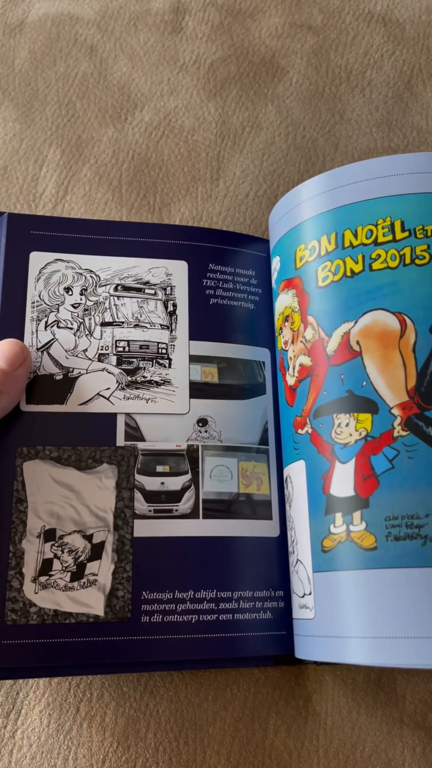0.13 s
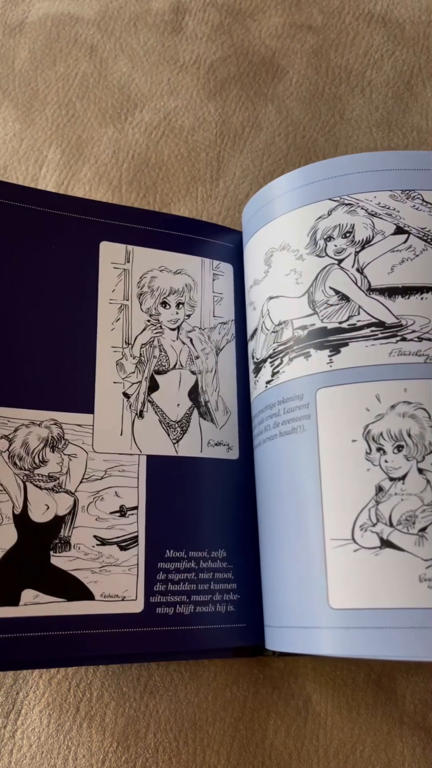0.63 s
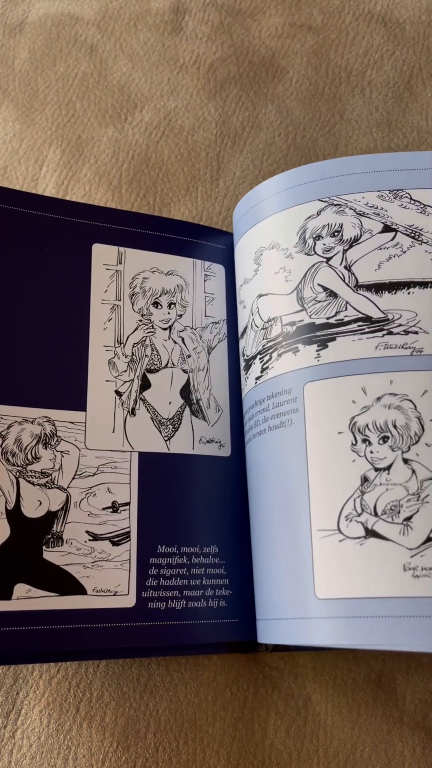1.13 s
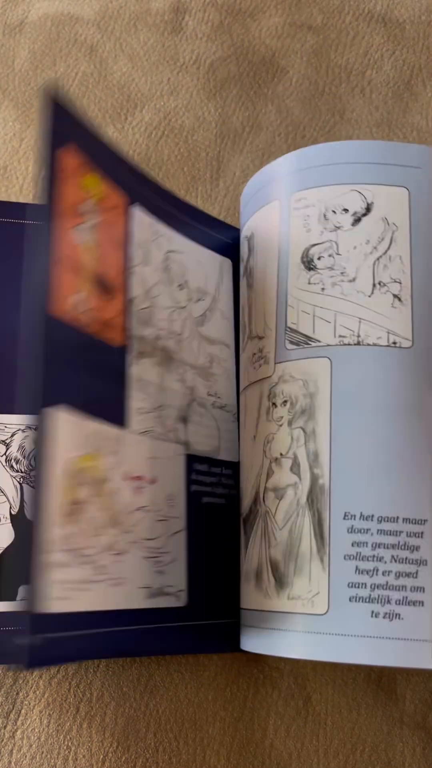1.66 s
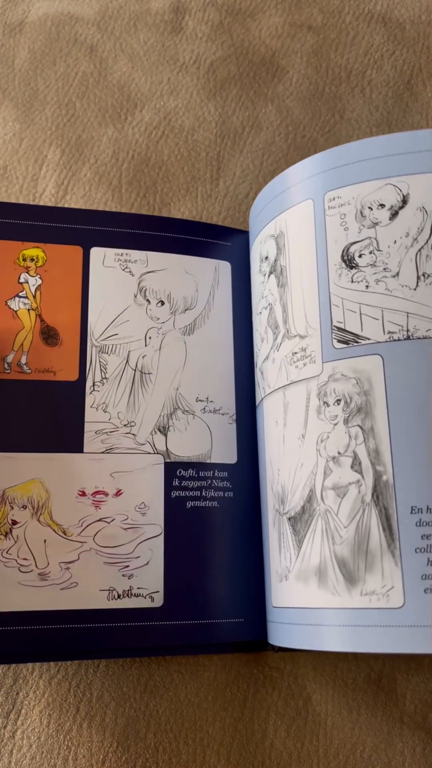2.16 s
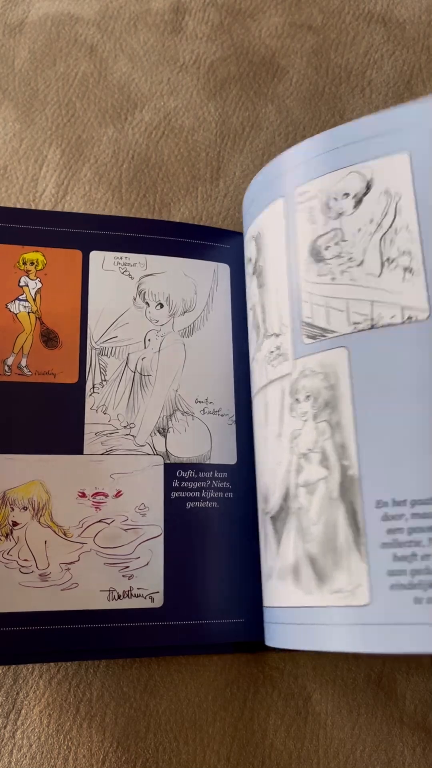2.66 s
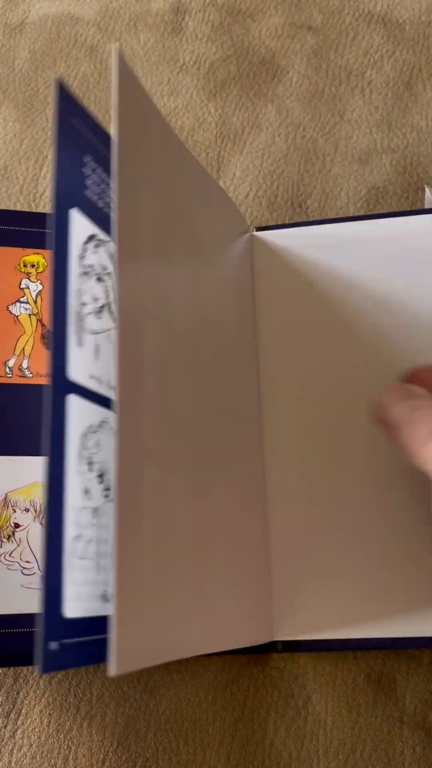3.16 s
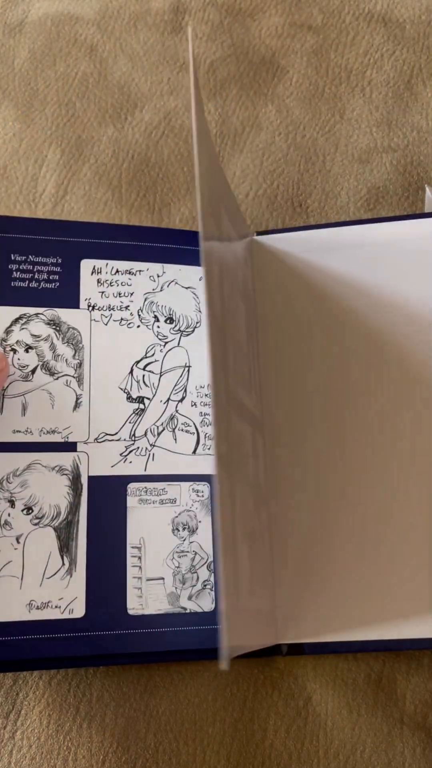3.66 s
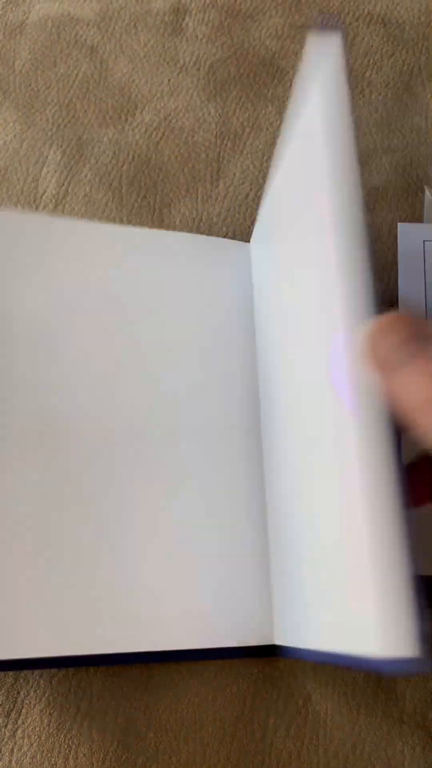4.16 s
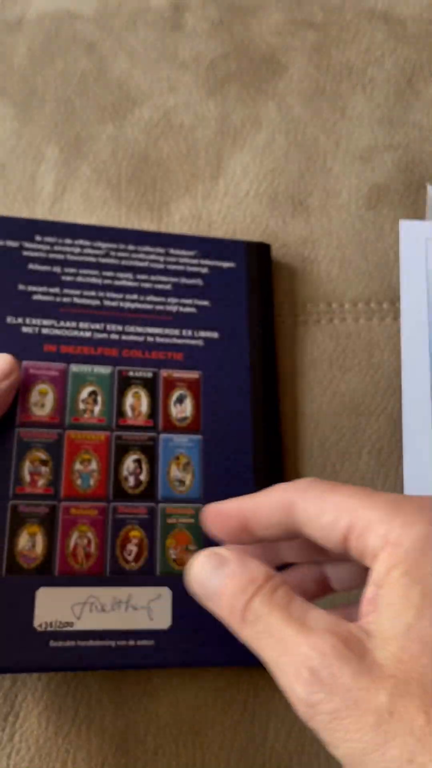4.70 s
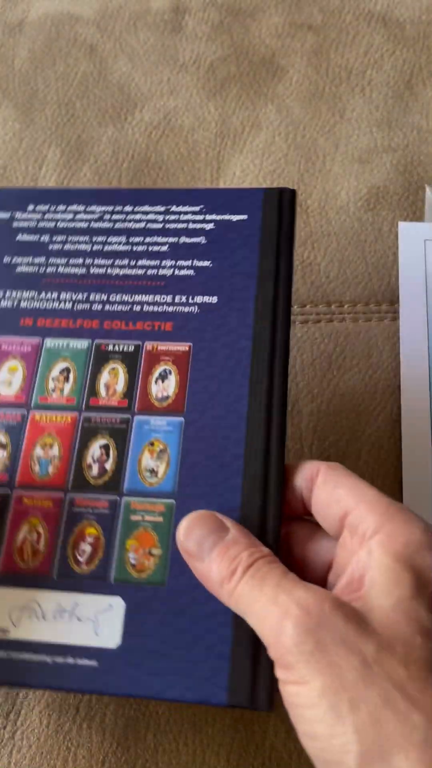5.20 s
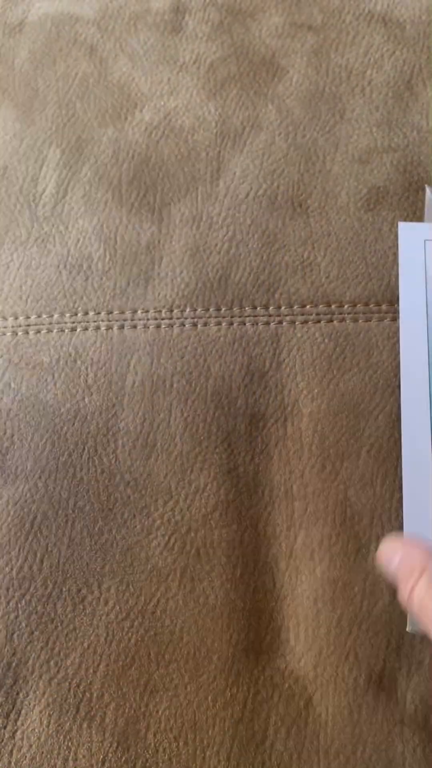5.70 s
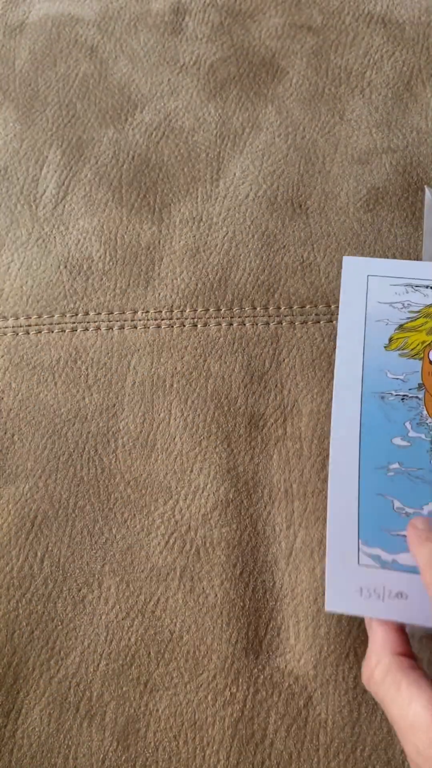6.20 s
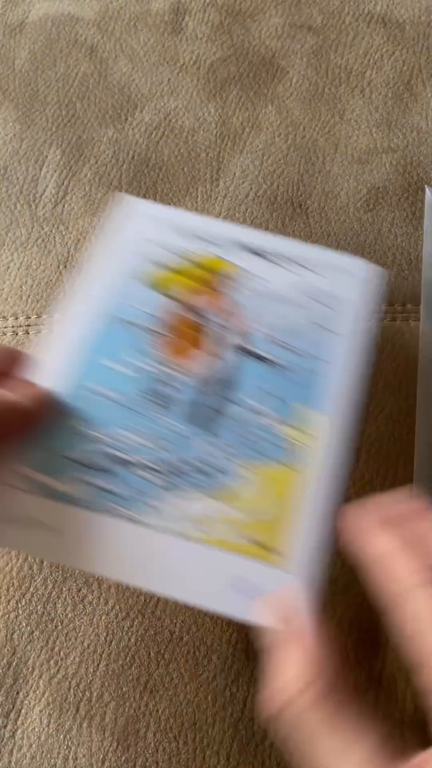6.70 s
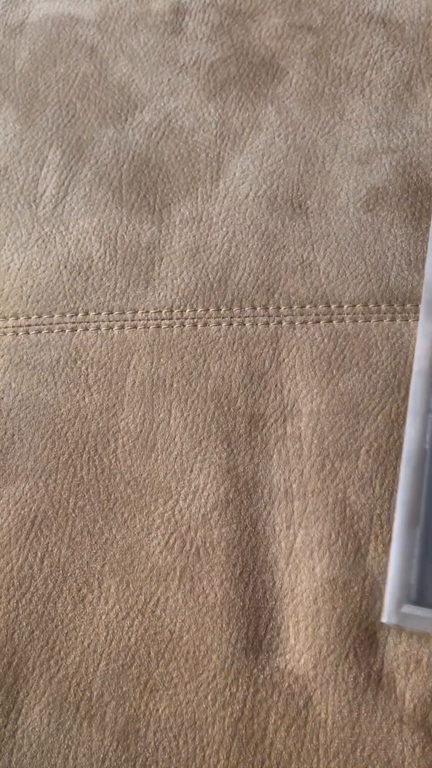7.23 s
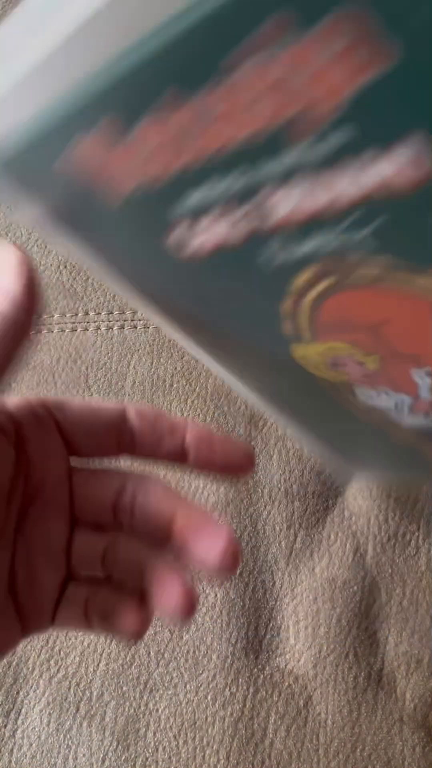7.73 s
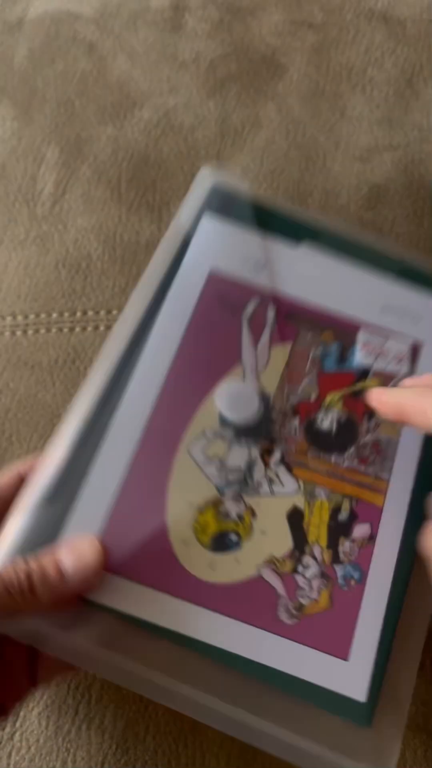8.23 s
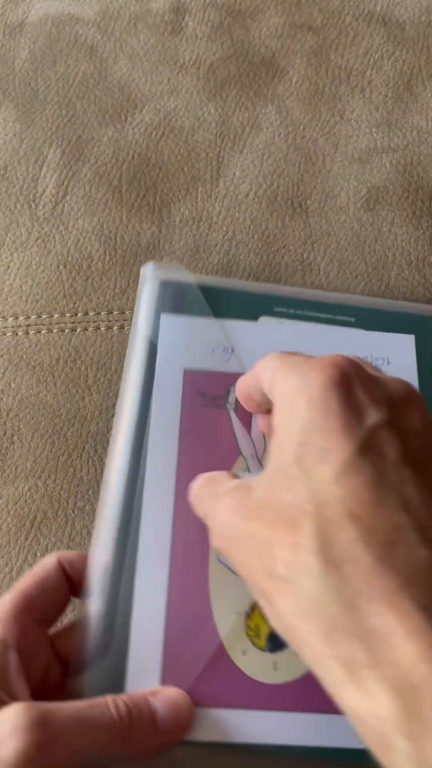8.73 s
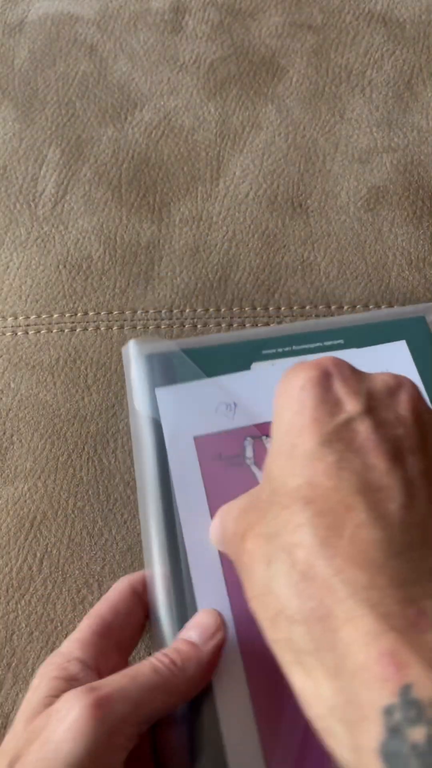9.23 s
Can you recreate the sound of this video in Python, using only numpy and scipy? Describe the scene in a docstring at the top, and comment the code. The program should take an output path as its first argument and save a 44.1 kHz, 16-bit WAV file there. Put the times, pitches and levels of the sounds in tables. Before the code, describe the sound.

Close handling sounds in a quiet, soft-furnished room, over faint rumble and hiss. At 0.2 and 0.4 s glossy pages flick with small snaps; soft sliding follows, with another turn at 1.35 to 1.9 s. A brighter flick snaps at 2.75 s, then a dull cover bump and light ticks at 3.3 s. Sparse, faint paper clicks run through 4.0 to 4.6 s as the book shuts; fingers tap and rub the cover around 5 s. At 6.0 s comes a knock, then at 6.2 s a deep, heavy cushioned thud, the strongest low hit. Card rustles and ticks until 6.6 s; a cluster of sharp snaps comes at 7.0 s. At 7.7 s the plastic sleeve is grabbed: loud crumple, knock and a brief falling squeak. Crisp clacks follow at 7.9, 8.1 and 8.3 s, then rubbing and crackles, with hard snaps at 9.1 and 9.3 s.

```python
"""Book pages and a plastic sleeve

Pages of a hardcover book are turned on a leather couch, then a print and a plastic sleeve are picked up.
Fingers and sheets rub as filtered grains, paper and plastic snap as bursts that ring resonators, covers thud
on the cushion as sagging sines and the sleeve squeaks once as a gliding harmonic tone.
A low rumble of filtered noise and a faint hiss lie under it; the mono mix is widened to stereo by frequency.
"""
import sys
import numpy as np
from scipy import signal
from scipy.fft import rfft, irfft, next_fast_len
from scipy.io import wavfile

SR = 44100
rng = np.random.default_rng(int(sys.argv[2]) if len(sys.argv) > 2 else 0)


def materialize(psi):
    """Save the field psi as 16-bit PCM at rate SR to the path in sys.argv[1].

    A 1-D psi becomes a single channel; in a 2-D psi each row is a channel.
    """
    bounded = np.clip(np.atleast_2d(psi).T, -1, 1)
    quanta = np.round(bounded * 32767).astype(np.int16)
    wavfile.write(sys.argv[1], SR, quanta)


def volts_from_decibels(level):
    """Turn decibel levels (scalar or array-like) into linear amplitude factors."""
    exponent = np.asarray(level, float) / 20
    return 10 ** exponent


N = 413216
TIME = np.arange(N) / SR
SIZE = next_fast_len(N + SR // 2)
HZ = np.maximum(np.arange(SIZE // 2 + 1) * SR / SIZE, 1)


def rms_one(x):
    """Normalisation: scale to unit rms."""
    return x / np.sqrt(np.mean(x ** 2) + 1e-20)


def peak_one(x):
    """Normalisation: scale to unit peak."""
    return x / np.max(np.abs(x))


def in_time(rows):
    """Linear interpolation: the columns of a curve at every sample."""
    s, *columns = np.transpose(rows)
    return [np.interp(TIME, s, c) for c in columns]


def at_hz(points):
    """Interpolation on a log frequency axis: a spectrum at every frequency."""
    hz, values = np.array(points).T
    return np.interp(np.log(HZ), np.log(hz), values)


def colour(x, gain):
    """Linear filtering: weight the spectrum by a gain."""
    return irfft(rfft(x, SIZE) * gain, SIZE)[..., :N]


def drift(rate_hz):
    """Low-passed noise: a slow random fluctuation of unit rms."""
    return rms_one(colour(rng.standard_normal(N), 1 / (1 + (HZ / rate_hz) ** 2)))


def ring(x, hz, t60):
    """Damped resonator: a unit click sets a decaying sine of height 1 ringing."""
    radius = volts_from_decibels(-60 / (t60 * SR))
    angle = 2 * np.pi * min(hz, .4 * SR) / SR
    return signal.lfilter([0, np.sin(angle)], [1, -2 * radius * np.cos(angle), radius * radius], x)


def follow(x, hz, width_hz):
    """Heterodyne filter: a moving resonance is shifted to zero, smoothed and shifted back."""
    turn = np.exp(2j * np.pi * np.cumsum(hz) / SR)
    radius = np.exp(-np.pi * width_hz / SR)
    return np.real(turn * signal.lfilter([1], [1, -2 * radius, radius * radius], x / turn))


def add(out, s, sound):
    """Superposition: mix a sound in from time s."""
    i = round(s * SR)
    out[i:i + len(sound)] += sound[:N - i]


def rub():
    """Friction noise: grains catch in clumps over a smooth hiss; the bent sheet rings as it is gripped."""
    # tone of the handled material, stage by stage: book first, then print, then plastic sleeve
    # (from [s], hollow part [dB], ring of the bent sheet at gloss 0 [Hz], share of that ring [0-1])
    held = [(0.0, 4, 2180, 0.56), (1.25, -3, 2630, 0.06), (2.9, -0.5, 2900, 0.1), (4.3, -5, 2150, .15),
            (5.5, -10.5, 3000, 0), (6.501, -0.5, 2200, 0.18), (7.55, -4, 3920, 0.26),
            (8.55, -12, 2510, 0.16)]
    # colour of the rub, shaping each band before it is levelled: (frequency [Hz], density [dB per Hz])
    rub_colour = [(250, 5.5), (500, -8), (760, -5), (900, -2), (1080, -7.5), (1500, -4.5), (2400, 0),
                  (3600, -6.5), (5000, -14.5), (7000, -13.5), (10500, 4), (12200, 8), (14000, -30)]
    grains_per_s, crackles_per_s, crackle = 2500, 120, 0.43
    spread_db, clump_db, smooth = 3.0, -0.5, 1.0
    low_hz, high_hz, top_hz = 1350, 4800, 8800   # band edges
    bend_octaves_per_db, bend_width_hz = 0.015, 750   # glossier contact rings higher
    top_slope = 0.24   # a glossier slide is brighter still at the very top

    level, gloss_db = strokes()
    holding = np.searchsorted([row[0] for row in held[1:]], TIME)
    _, hollow_db, bend_hz, bend_share = np.array(held)[holding].T
    bend_hz = bend_hz * 2 ** (bend_octaves_per_db * gloss_db)

    sizes = volts_from_decibels(spread_db * np.minimum(rng.exponential(1, N), 5)) * rng.choice([-1, 1], N)
    grains = rms_one(sizes * (rng.random(N) < grains_per_s / SR))
    crackles = rms_one(sizes * (rng.random(N) < crackles_per_s / SR))   # sparse small creases
    source = grains + crackle * crackles + smooth * rng.standard_normal(N)
    source = source * volts_from_decibels(clump_db * drift(21.0))

    low = 1 / (1 + (HZ / low_hz) ** 6)
    high = 1 / (1 + (high_hz / HZ) ** 8)
    top = 1 / (1 + (top_hz / HZ) ** 12)
    bands = np.array([low, 1 - low - high, high - top, top])
    hollow, middle, sheen, air = map(rms_one, colour(source, volts_from_decibels(at_hz(rub_colour)) * bands))
    bend = rms_one(follow(source, bend_hz, bend_width_hz))
    middle = bend_share * bend + (1 - bend_share) * middle

    gains_db = [hollow_db, -1.5, gloss_db + 7, (1 + top_slope) * gloss_db + 0.1]
    flicker_db = [1.1 * drift(31.0) for _ in gains_db]
    parts = [hollow, middle, sheen, air]
    return level * sum(volts_from_decibels(g + f) * p for g, f, p in zip(gains_db, flicker_db, parts))


def strokes():
    """Incoherent addition: slides and flicks sum by power into a contact strength and a mean gloss."""
    # sheets and fingers sliding under steady contact:
    # (start [s], end [s], start level [dB], end level [dB], gloss [dB])
    slides = [(0.44, 0.637, -63, -77, -14), (0.871, 1.015, -75, -81.5, -32), (1.03, 1.123, -80, -84.5, -1),
              (1.296, 1.447, -69, -64.5, -7), (1.47, 1.623, -84, -71.5, -19.5),
              (1.62, 1.84, -68.5, -65, -1), (1.89, 1.954, -64.5, -62.5, -11),
              (1.99, 2.221, -71.5, -76, -14), (2.449, 2.591, -76.5, -69, -10.5),
              (3.313, 3.526, -67.5, -82, -12.5), (3.46, 3.513, -86, -80.5, 26),
              (3.93, 4.056, -87, -89, 4.5), (4.14, 4.184, -92, -92, 18), (4.72, 4.835, -83, -76, -12),
              (4.952, 5.058, -68, -71.5, 5), (5.05, 5.154, -83, -88, 12), (5.272, 5.31, -68.5, -61, 1),
              (5.345, 5.411, -68.5, -68, 8), (5.861, 5.91, -63.5, -74, -11), (5.898, 6.21, -64, -60, 1),
              (6.228, 6.398, -67.5, -54, -3), (6.413, 6.596, -51.5, -61, -5),
              (6.771, 6.87, -74.5, -80.5, 9.5), (7, 7.084, -44.5, -48.5, -10),
              (7.092, 7.139, -56.5, -55.5, -2.1), (7.15, 7.301, -65.5, -62, 3),
              (7.32, 7.502, -67.5, -66.5, -3), (7.563, 7.722, -74, -64, -1.5), (7.79, 8.05, -53, -72, 20),
              (8.16, 8.297, -67.5, -49.5, -8), (8.317, 8.603, -60, -75.5, -3.5),
              (8.609, 8.725, -55.5, -51, -13.5), (8.738, 8.825, -48.5, -43, -14),
              (8.932, 9.069, -60, -49.5, -9), (9.116, 9.256, -72.5, -56.5, -0.5)]
    # sheets flicked or crumpled, swelling to a peak; rise and fall are the times to change by span_db:
    # (peak time [s], level [dB], rise [s], fall [s], gloss [dB])
    flicks = [(0.167, -62.5, 0.094, 0.054, 0), (0.43, -64.5, 0.13, .1, -14.5), (1.83, -55, 0.052, 0.12, -3),
              (2.348, -60.5, 0.091, 0.042, -24), (2.66, -55, 0.03, 0.029, 6),
              (2.757, -47.5, 0.056, 0.04, -7), (2.8, -64.5, 0.022, 0.16, -9.5),
              (3.004, -69.5, 0.044, 0.032, -9), (3.582, -73.5, 0.0082, 0.2, -12),
              (4.072, -73, .005, 0.14, -3), (4.44, -64.5, 0.013, .06, 0.5), (5.052, -56, 0.0056, .12, -1),
              (6.211, -45, 0.12, 0.04, -10), (5.6, -73.5, 0.24, 0.14, -14), (6.888, -54, 0.018, 0.13, 1),
              (7.735, -26.5, 0.039, .12, -12.5), (7.923, -42.5, 0.13, 0.14, -7),
              (8.116, -36, 0.094, 0.043, -8), (8.304, -27, 0.0066, 0.0047, -33),
              (8.906, -38.5, 0.079, 0.052, -10), (9.081, -49, 0.025, 0.078, -5.5),
              (9.277, -41, 0.017, 0.1, -6)]
    span_db = 30
    touch_db_per_s, let_go_db_per_s = 1701.5, 893   # a slide sets in and dies away
    levels_db, gloss_db = [], []
    for start, end, start_db, end_db, gloss in slides:
        outside = np.maximum(touch_db_per_s * (start - TIME), let_go_db_per_s * (TIME - end))
        levels_db.append(np.interp(TIME, [start, end], [start_db, end_db]) - np.maximum(0, outside))
        gloss_db.append(gloss)
    for s, db, rise, fall, gloss in flicks:
        away = np.maximum((s - TIME) / max(rise, .001), (TIME - s) / max(fall, .001))
        levels_db.append(db - span_db * away)
        gloss_db.append(gloss)
    power = np.array([volts_from_decibels(2 * np.maximum(db, -150)) for db in levels_db])
    total = power.sum(axis=0)
    return np.sqrt(total), np.array(gloss_db) @ power / total


def page_gaps(x):
    """Sympathetic resonance: while the book lies open, the slits between its pages ring along."""
    # air between the pages: (resonance [Hz], width [Hz], level [dB])
    gaps = [(893, 350, 2), (1727, 96, -8), (2240, 31, -6), (3860, 1100, -5), (5550, 460, 4.5)]
    book_shut_s = 4.2
    response = sum(volts_from_decibels(db) / (1 + 2j * (HZ - hz) / width_hz) for hz, width_hz, db in gaps)
    return x + colour(x * (TIME < book_shut_s), response)


def patches(x, patchy_db=2.5, rate_hz=6.2, count=14):
    """Uneven radiation: as the sheet flexes, each slice of the spectrum swells and sinks on its own."""
    place = np.interp(np.log(HZ), np.log([500, 12000]), [0, count - 1])
    # overlapping triangles that sum to one
    slices = colour(x, np.clip(1 - np.abs(place - np.arange(count)[:, None]), 0, 1))
    return sum(volts_from_decibels(patchy_db * drift(rate_hz)) * part for part in slices)


def snaps():
    """Buckling instability: a sheet lets go in a brief burst after a faint lead-in, rings and rustles."""
    # paper and plastic buckling: (release [s], level [dB], ring [Hz], crispness [dB])
    buckles = [(0.17, -32, 1110, -0.5), (0.424, -37.5, 2190, -22), (0.436, -35.5, 1440, -8),
               (1.352, -38.5, 4500, -2.5), (1.555, -47.5, 860, -58), (1.82, -42, 2750, -5),
               (1.928, -44.5, 2080, -30), (2.24, -51, 880, -37), (2.512, -51, 860, -18),
               (2.75, -39.5, 2560, 7), (2.794, -31, 2750, -3.5), (2.835, -45, 780, -7),
               (2.945, -48.5, 920, -69), (3.311, -36, 1760, -10.5), (3.328, -38, 1410, -15),
               (3.348, -40, 890, -17.5), (3.462, -42, 885, -54), (3.482, -46.5, 876, -8),
               (3.58, -57, 3020, -28), (3.61, -54, 760, -38), (3.687, -56.5, 1420, -11),
               (3.778, -48, 960, -48), (4.072, -39.5, 1820, 12), (4.439, -45.5, 1680, -18),
               (4.575, -48, 1910, -18), (4.903, -56, 820, -1), (4.948, -44.5, 990, 8),
               (5.054, -32, 1070, -21.5), (5.078, -54, 2790, -11), (5.093, -50, 1060, 7),
               (5.104, -43, 1180, -8), (5.307, -43, 1140, -22), (5.355, -43, 1280, -9),
               (5.851, -47, 2980, -23), (6.006, -25.5, 756, -20), (6.096, -37.5, 895, -29),
               (6.201, -23.5, 970, -18), (6.221, -32, 850, -18), (6.269, -35, 1950, -19),
               (6.536, -37.5, 1250, -24), (6.557, -37.5, 1110, -4.5), (6.586, -34.5, 1300, -7.5),
               (6.626, -41.5, 1290, -32), (6.883, -26, 2380, -10.5), (6.921, -41, 3190, 0),
               (6.993, -33, 1200, -2), (7.009, -24.5, 1370, -7), (7.03, -19, 1630, -12),
               (7.044, -18.5, 2700, -15), (7.125, -38, 1840, 0), (7.203, -33, 2090, -51),
               (7.232, -34.5, 1860, -6), (7.322, -34.5, 2040, -13), (7.348, -37, 1740, -7),
               (7.683, -30.5, 2580, -15.5), (7.768, -17, 1380, -16), (7.862, -28.5, 1900, -15.5),
               (7.926, -17, 3860, -26), (7.933, -18.5, 3170, -38), (7.97, -33, 2760, -57.5),
               (8.015, -33.5, 1740, -10), (8.124, -21.5, 890, -15), (8.267, -15, 2570, -15),
               (8.3, -15, 1880, -10), (8.369, -43, 1840, 2.5), (8.625, -37, 2490, -17),
               (8.738, -26.5, 2510, -46), (8.763, -22, 2860, -29), (8.919, -26.5, 2480, -16),
               (9.082, -18.5, 2780, -14.5), (9.088, -28.5, 950, -32), (9.211, -40.5, 2480, 1),
               (9.239, -37.5, 3000, -14), (9.278, -15.5, 3350, -1.5), (9.282, -12, 1170, -18),
               (9.34, -28.5, 2440, -16)]
    lead_s, lead_in_db, lead_in_s = 0.02, -24.5, 0.0056   # faint noise rises before each snap
    burst_s, slack_db = 0.00054, 9.0   # shortest time constant, and its growth with the moving sheet
    rustle_db, rustle_s = -8.5, 0.0043
    cycles, ring_share = 8.0, 0.59   # ring periods per 60 dB of decay
    # crisp buckles are broader and crack higher
    wide_db, wide_per_crisp = 3.5, 0.46
    treble_db, crack_hz, crack_octaves_per_db = 10.0, 6800, 0.08
    # dull, low buckles move more of the sheet
    body_db, body_hz, body_per_crisp, body_db_per_octave = -24.5, 480, -0.3, -5.5

    out, t = np.zeros(N), TIME[:4096]
    noise = rng.standard_normal((len(buckles), 2, len(t)))
    wide_band = signal.butter(2, [900, 4600], "band", fs=SR, output="sos")
    after = np.maximum(t - lead_s, 0)
    lead_in = volts_from_decibels(lead_in_db) * np.exp(np.minimum(t - lead_s, 0) / lead_in_s)
    rustle = volts_from_decibels(rustle_db) * np.exp(-after / rustle_s)
    for (s, db, hz, crisp_db), (first, second) in zip(buckles, noise):
        low_db = body_db + body_per_crisp * crisp_db + body_db_per_octave * np.log2(hz / 1500)
        lasts = burst_s * (1 + volts_from_decibels(low_db + slack_db))   # the more sheet moves, the slower it lets go
        release = after / lasts * np.exp(-after / lasts)
        shape = np.where(t < lead_s, lead_in, release + rustle)
        burst = first * shape

        corner_hz = min(crack_hz * 2 ** (crack_octaves_per_db * crisp_db), .4 * SR)
        crack_band = signal.butter(2, corner_hz, "high", fs=SR, output="sos")
        ringing = peak_one(ring(burst, hz, cycles / hz))
        wide = volts_from_decibels(wide_db + wide_per_crisp * crisp_db) * peak_one(signal.sosfilt(wide_band, burst))
        crack = volts_from_decibels(crisp_db + treble_db) * peak_one(signal.sosfilt(crack_band, second * shape))
        body = volts_from_decibels(low_db) * peak_one(ring(burst, body_hz, 1.0 / body_hz))
        sound = ring_share * ringing + (1 - ring_share) * wide + crack + body
        add(out, s - lead_s, volts_from_decibels(db) * sound)
    return out


def thuds():
    """Damped impact: an uneven push sags in pitch as squeezed air escapes; a deep cushion note swells."""
    # covers and sheets landing on the cushion:
    # (time [s], level [dB], end pitch [Hz], weight on the cushion [dB re the deep note's own gain])
    landings = [(0.424, -39.5, 199, -20), (0.559, -51.5, 259, -25), (2.792, -47.5, 167, -14),
                (2.941, -41, 78, -19), (3.327, -34, 71, -23), (3.456, -41.5, 214.3, -23),
                (5.057, -39, 175.4, -18), (6.006, -29.5, 227, -5.5), (6.204, -0.5, 91.8, -20),
                (7, -44, 232, -22), (7.03, -37, 225, -24), (7.045, -39, 190, -16), (7.331, -38, 158.3, -1),
                (7.353, -31.5, 161.6, -33), (7.738, -16.5, 289, -33.5), (7.772, -18, 137.7, -18),
                (8.013, -32.5, 83, -1), (8.053, -43, 89, 14), (8.109, -35, 88, -16), (8.267, -29, 310, -17),
                (8.302, -26.5, 94.3, -8), (8.727, -46, 61, 2.5), (9.086, -36.5, 248, -24),
                (9.282, -36, 109, -21), (9.337, -36.5, 200, -29)]
    pitch_excess, fall_s, rise_s = 2.51, 0.00437, 0.0078   # start pitch is 1 + excess times the end pitch
    deep_gain_db, deep_hz, deep_t60, deep_rise_s = 11.0, 64, 0.11, 0.022
    soft_db, soft_t60_s, t60_halves_db = -50, .21, 16.5   # harder landings are squeezed dead sooner
    uneven_db, cut_hz = 4.0, 35

    out, t = np.zeros(N), TIME[:SR // 3]
    deep = (1 - np.exp(-t / deep_rise_s)) * volts_from_decibels(-60 * t / deep_t60) * np.sin(2 * np.pi * deep_hz * t)
    for s, db, hz, deep_db in landings:
        t60 = soft_t60_s * .5 ** ((db - soft_db) / t60_halves_db)
        cycles = hz * (t + pitch_excess * fall_s * (1 - np.exp(-t / fall_s)))
        push = volts_from_decibels(-60 * t / t60) * (1 - np.exp(-t / rise_s)) * np.sin(2 * np.pi * cycles)
        add(out, s, volts_from_decibels(db) * (push + volts_from_decibels(deep_db + deep_gain_db) * deep))
    # the very lowest frequencies are cut away
    high_pass = signal.butter(2, cut_hz, "high", fs=SR, output="sos")
    return signal.sosfilt(high_pass, out * volts_from_decibels(uneven_db * drift(98.0)))


def squeak(jitter=0.033, waver_db=-4.0, fade_s=0.016):
    """Stick-slip: plastic slips over plastic at a gliding rate, uneven in pitch and strength."""
    # (time [s], slip rate [Hz], level [dB])
    slips = [(7.712, 1707, -38), (7.742, 1482, -24.5), (7.761, 1306, -27), (7.796, 1410, -53)]
    # (multiple of the slip rate [1], level [dB re fundamental])
    overtones = [(2, -12), (3, -12)]
    hz, db = in_time(slips)
    phase = 2 * np.pi * np.cumsum(hz * (1 + jitter * drift(150.))) / SR
    tone = np.sin(phase)
    for multiple, overtone_db in overtones:
        tone = tone + volts_from_decibels(overtone_db + waver_db * drift(200.)) * np.sin(multiple * phase)
    gate = np.clip(np.minimum(TIME - slips[0][0], slips[-1][0] - TIME) / fade_s, 0, 1)
    return np.sqrt(2) * volts_from_decibels(db + waver_db * drift(200.)) * gate * tone


def room(x):
    """Reverberation: six feedback delays a side, duller on every round."""
    t60_s, level_db, wall_cut_hz = 0.18, -17, 2500   # decay before the wall loss
    wet = np.zeros((2, len(HZ)), complex)
    for k, lag in enumerate(rng.uniform(0.01, 0.027, 12)):
        delay = np.exp(-2j * np.pi * HZ * lag)
        loop = volts_from_decibels(-60 * lag / t60_s) / (1 + 1j * HZ / wall_cut_hz) * delay
        wet[k % 2] += loop / (1 - loop) * (-1) ** (k // 2)
    return volts_from_decibels(level_db) * colour(x, wet / (1 + (250 / HZ) ** 4))   # soft furniture, little low echo


def widen(x):
    """Stereo decorrelation: phase and balance of a mono mix turn by frequency; random flutter loosens it."""
    # (frequency [Hz], phase by which left leads [rad])
    side_phase = [(0, 0), (1890, 0.0), (2580, 0.5), (3960, 0.8), (4500, 1.3), (4720, 1.9), (4980, 4.4),
                  (5250, 5.2), (5680, 6.2), (6200, 6.4), (8350, 9.1), (9560, 9.5), (11800, 12.4),
                  (13800, 12.7), (14500, 15.3), (15200, 15.1)]
    # (frequency [Hz], left minus right [dB])
    side_balance = [(60, 0.0), (120, -0.5), (240, -1.5), (480, -2.0), (950, -1.0), (1890, -0.5),
                    (3770, -1.0), (7520, 0.0), (15000, 0.0)]
    # strength of the flutter: (frequency [Hz], level [dB])
    flutter_colour = [(150, -34), (300, -18), (550, -11), (1000, -16), (1700, -24), (2700, -9), (3800, -10),
                      (4850, -7), (5400, -10), (5900, -14), (7200, -9), (8300, -16), (9300, -30),
                      (11000, -15), (15000, -20)]
    # half of each difference goes to either side, as a complex log gain
    half = .5j * np.interp(HZ, *np.transpose(side_phase)) + np.log(10) / 40 * at_hz(side_balance)
    flutter = np.array([drift(25.), drift(25.)])   # independent on each side
    return colour(x, np.exp([half, -half])) + flutter * colour(x, volts_from_decibels(at_hz(flutter_colour)))


def rumble():
    """Band-limited noise: a low rumble whose level rises and dips, with thud tails and page air in it."""
    # (time [s], level [dB], lean towards the lowest band [dB])
    swell = [(0.0, -65, -4), (0.49, -57, -2.1), (0.8, -58.5, 0.3), (1.7, -58.5, -1.5), (2.3, -59, 2),
             (3.0, -58.5, 0.1), (4.0, -59, -0.2), (5.6, -57.5, 2.5), (6.13, -53.5, -3.3), (6.5, -60, 0.5),
             (7.2, -56, 0.1), (7.44, -66, -2), (8.1, -56, 0.6), (8.82, -66.5, 0.5), (9.37, -62.5, 0.6)]
    # colour, shaping each band before it is levelled: (frequency [Hz], density [dB per Hz])
    rumble_colour = [(22, -22), (40, 0), (55, -1), (70, 11), (95, 6), (140, -8.5), (190, 4), (215, 1),
                     (240, 3), (272, -11.5), (310, -19.5), (500, -47.5), (900, -33), (1500, -42)]
    db, lean_db = in_time(swell)
    deep = 1 / (1 + (HZ / 140) ** 6)
    bands = volts_from_decibels(at_hz(rumble_colour)) * np.array([deep, 1 - deep])
    below, above = map(rms_one, colour(rng.standard_normal(N), bands))
    below = volts_from_decibels(2.5 + lean_db + 1.33 * drift(3.8)) * below
    above = volts_from_decibels(-2.2 - lean_db + 1.2 * drift(2.4)) * above
    return volts_from_decibels(db) * (below + above)


def faint_hiss():
    """Stationary noise: a steady coloured hiss above 250 Hz."""
    # (frequency [Hz], relative density [dB per Hz])
    hiss_colour = [(300, 12), (1000, -7), (3000, -4), (8000, -21), (12000, 1)]
    return volts_from_decibels(-77) * rms_one(colour(rng.standard_normal(N), volts_from_decibels(at_hz(hiss_colour)) * (HZ > 250)))


def diffuse_air():
    """Diffuse field: low-middle noise around 450 Hz, independent on the two sides."""
    return volts_from_decibels(-76.5) * rms_one(colour(rng.standard_normal((2, N)), 1 / (1 + ((HZ - 450) / 180) ** 2)))


def scene():
    """Superposition: hands at work, the room around them and a faint hiss."""
    hands = patches(page_gaps(rub())) + snaps() + thuds() + squeak()
    return widen(hands + rumble() + faint_hiss()) + room(hands) + diffuse_air()


def low_pass(x):
    """Removes everything above the highest recorded frequency."""
    return signal.sosfilt(signal.butter(12, 15670, fs=SR, output="sos"), x)


def record(dry):
    """Frequency response: an overall tone with the highest treble steeply cut shapes the finished mix."""
    # overall tone: (frequency [Hz], gain [dB])
    overall_tone = [(20, 0.5), (4000, -1.5), (6000, -2), (10500, -1.5), (11500, -12), (12500, -31),
                    (15500, -40.5)]
    mix = colour(dry, volts_from_decibels(at_hz(overall_tone)))
    return low_pass(mix)


dry = scene()
out = record(dry)
materialize(out)
```